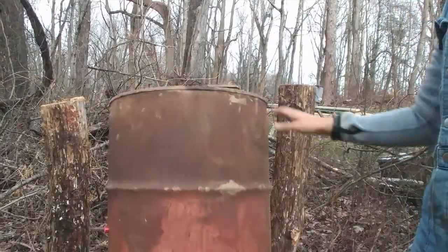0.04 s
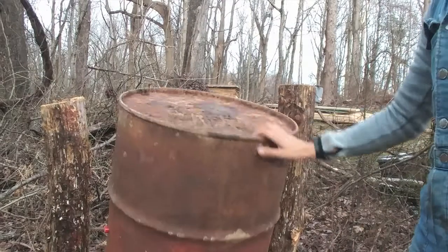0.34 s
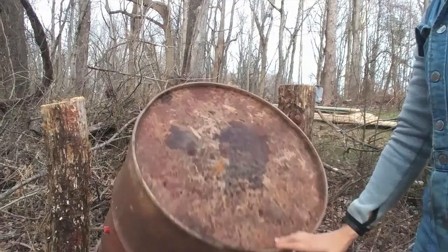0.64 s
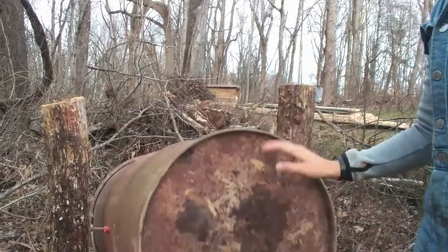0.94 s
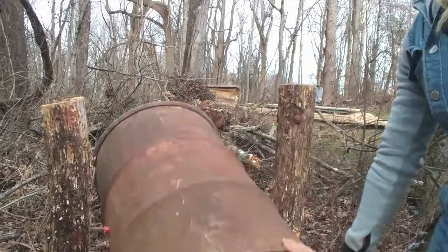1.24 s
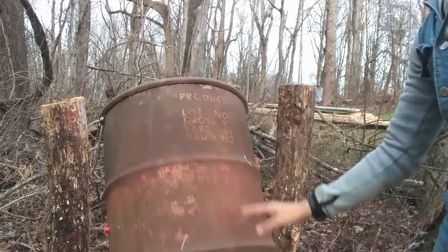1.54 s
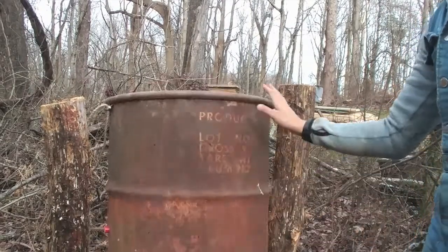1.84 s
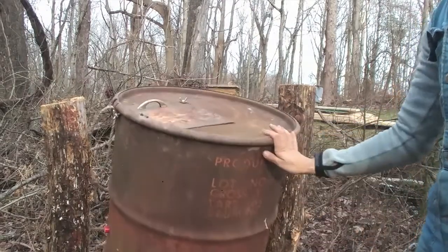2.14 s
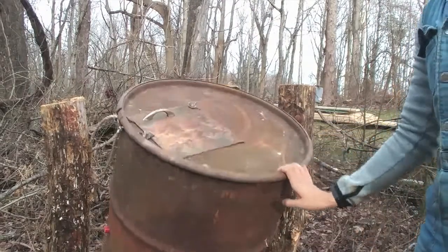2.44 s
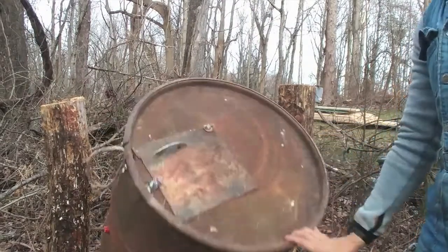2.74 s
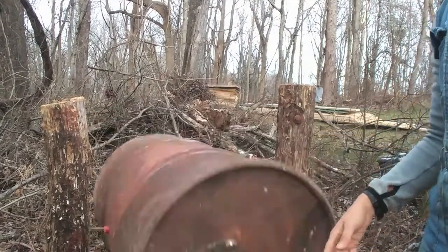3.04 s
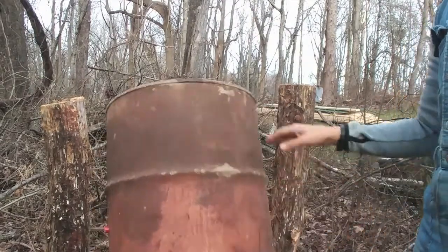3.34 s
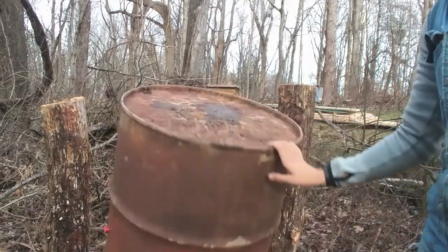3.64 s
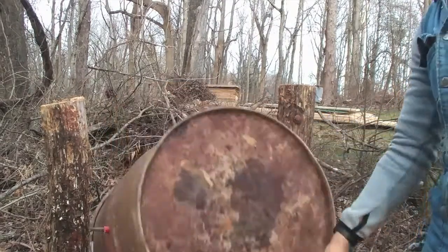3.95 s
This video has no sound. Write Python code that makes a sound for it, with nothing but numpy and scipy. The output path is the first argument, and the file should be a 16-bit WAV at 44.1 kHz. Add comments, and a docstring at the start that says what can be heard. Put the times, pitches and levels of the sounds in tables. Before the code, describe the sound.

Compost tumbles inside a turning steel drum, outdoors, close on the right. Rustling and sharp clacks lead into hollow, ringing thumps from about 0.3 to 0.5 seconds. After a lull near 1 second, dry litter slides again and clods boom down around 1.9 seconds. Softer scraping follows, then more thumps at 3.4 seconds, with clacks, rumbling lumps, brief hissing flakes and a faint high rust squeak near the end.

```python
"""Outdoors, close by and to the right, a rusty steel compost drum is turned end over end by hand.
At each half turn clods thump onto the end, which booms and rings, and hard bits clack on the steel.
Dry litter rustles along the wall, heavier compost scrapes after it and small lumps tumble: each is a
stream of tiny hits. Fine flakes hiss down, and the rust squeaks as it rubs.
Behind it lie a quiet low rumble and the microphone's thin hiss."""
import sys
import numpy as np
from scipy import signal
from scipy.fft import rfft, irfft
from scipy.io import wavfile

SR = 44100
rng = np.random.default_rng(int(sys.argv[2]) if len(sys.argv) > 2 else 0)


def int16_out(signal):
    """Quantize to a 16-bit WAV file."""
    q = np.round(np.clip(np.atleast_2d(signal).T, -1, 1) * 32767)
    wavfile.write(sys.argv[1], SR, q.astype(np.int16))


N = 176400
TIME = np.arange(N) / SR

# Levels are relative. A ring time is how long a sound takes to fade by 60 dB.
# Clods landing: (time [s], boom level [dB], boom pitch [Hz], boom ring time [s], drum ring level [dB],
# thud level [dB], treble cutoff [Hz])
CLOD_HITS = [(0.254, -14, 212, .16, -45, -48, 350), (0.267, -19.5, 70, 0.25, -33, -22, 412),
             (.287, -20, 215, 0.064, -46, -26, 506), (.375, -18.5, 141, 0.16, -18, -21, 1100),
             (0.382, -24.5, 73, 0.3, -40, -39, 900), (.406, -31.5, 165.6, 1.06, -35, -29, 864),
             (0.467, -26.5, 390, 0.42, -29, -32, 900), (1.841, -14, 132.7, 0.38, -47, -27, 425),
             (1.857, -23, 85.9, 0.65, -31, -55, 600), (1.954, -21.5, 90, 0.24, -29, -43, 292),
             (1.98, -14, 170, 0.18, -27, -21.5, 945), (1.992, -20.5, 333, 0.12, -35, -27, 800),
             (2.001, -22, 85.5, 0.48, -25.5, -24, 750), (2.012, -27.5, 214.7, 0.64, -35, -29, 800),
             (3.412, -22.5, 216, 0.47, -30, -21.5, 1100), (3.425, -20, 62, 0.091, -26.5, -29, 930),
             (3.44, -20, 64, 0.1, -34.5, -20, 600), (3.793, -39, 206.4, 0.96, -31.5, -47, 895)]
# Hard bits striking: (time [s], level [dB], ring time [s], gain below 1.2 kHz [dB], gain above 8 kHz [dB])
HARD_HITS = [(0.101, -29.5, 0.11, -19, -37), (0.181, -33.5, 0.55, 3, -24), (0.212, -22.5, 0.088, -1.5, 4.5),
             (.228, -28.5, 0.77, 10, -9), (0.376, -32, 0.1, 11, 4), (.742, -37, 0.25, -5, -57),
             (1.356, -36, 0.48, -10, -26), (1.579, -38.5, 0.38, 1, -6), (1.764, -33.5, 0.26, -16, -9),
             (1.455, -36.5, 0.085, -6, -11), (1.845, -28.5, 0.32, 14, -56), (2.991, -53, 0.21, -21, 7),
             (3.017, -47, 0.1, -4, 11), (3.282, -39.5, 0.37, -15, -4.5), (3.348, -35, 1, -4.5, -5),
             (3.424, -27.5, 0.15, 4, -2.5), (3.547, -26.5, 0.27, 10, -9), (3.597, -26.5, 0.16, -12, -12),
             (3.78, -32, 0.29, -20, -3.5), (3.961, -29.5, 0.39, -11, -6)]
# How loud the litter, compost and lumps are as they move: (time [s], level [dB])
LITTER_LEVELS = [(0, -38.5), (.28, -37), (.34, -47), (.40, -38.5), (.55, -43), (.66, -38.5), (.8, -52),
                 (.91, -65.5), (1.05, -59.5), (1.17, -62.5), (1.38, -45.5), (1.53, -50.5), (1.62, -40.5),
                 (1.80, -43.5), (2.02, -48), (2.15, -59.5), (2.42, -63), (2.52, -48.5), (2.67, -43),
                 (2.82, -51.5), (2.87, -63), (2.985, -62.5), (3.03, -49.5), (3.15, -46.5), (3.22, -54),
                 (3.45, -36.5), (3.72, -43), (3.88, -37), (3.95, -47.5), (4, -54)]
COMPOST_LEVELS = [(0, -42.5), (.11, -53), (.25, -41.5), (.49, -39.5), (.58, -47), (.68, -50), (.9, -75.5),
                  (1.19, -73), (1.33, -49.5), (1.52, -52), (1.6, -47), (2.0, -44), (2.2, -64.5),
                  (2.345, -63.5), (2.375, -48), (2.44, -60.5), (2.63, -48.5), (2.92, -80), (3.16, -50.5),
                  (3.22, -63.5), (3.45, -43.5), (3.85, -45), (4, -57.5)]
LUMP_LEVELS = [(0, -34), (.14, -45.5), (.32, -27.5), (.44, -32.5), (.49, -25.5), (.55, -35.5), (1.05, -71),
               (1.7, -64.5), (2.04, -32.5), (2.4, -68.5), (2.92, -77), (3.14, -53), (3.165, -46),
               (3.28, -62.5), (3.47, -29), (3.55, -38), (3.77, -51), (3.81, -30.5), (3.89, -31.5), (4, -45)]
# Showers of flakes: (time [s], fade time [s], level [dB], gain at 10.6 kHz [dB])
FLAKE_SHOWERS = [(.351, 0.059, -39.5, -14), (0.782, 0.38, -57, -31), (2.235, 0.057, -59.5, -22),
                 (3.599, 0.0086, -37.5, -11), (3.769, 0.023, -41, -9)]
# Rust rubbing: (time [s], length [s], level [dB])
RUST_SQUEAKS = [(0.597, 0.12, -48), (3.848, 0.1, -44.5)]
# The drum's low ringing tones and the rim's bright ones: (pitch [Hz], level [dB], ring time [s])
DRUM_TONES = [(60, -31, 0.48), (85.6, -15, 1), (135.1, -4, 0.46), (162.2, -5.5, 0.48), (209.8, -5, 0.49),
              (285.8, -0.5, 0.18), (323.6, -4, 0.18), (384, -2, 0.14), (448.5, -13.5, 0.53),
              (495.3, -2.5, 0.16), (605, -11.5, 0.29), (750, -14.5, 0.24), (801, -7.5, 0.32),
              (898, -14, .36), (1158, -11, 0.49)]
RIM_TONES = [(875, -23, 0.8), (2880, -4.5, .2), (2870, -10.5, .18)]
# How long the wall's many crowded tones last: (frequency [Hz], ring time [s])
WALL_RING_TIMES = [(100, 0.013), (400, 0.11), (1000, 0.049), (3000, 0.065), (8000, 0.16)]
# Each sound's colour, its balance of bass and treble at the microphone: (frequency [Hz], level [dB])
THUD_COLOUR = [(25, -30.5), (55, 5.5), (200, 2.5), (450, -3), (900, -2.5), (2000, -24), (6000, -18)]
CLACK_COLOUR = [(200, -37), (550, -27), (900, -15), (2300, -6), (2880, -1.5), (3500, -7), (5800, -11.5),
                (7000, -18.5), (8200, -9), (9400, -7.5), (10600, -30.5), (15000, -36.5)]
LITTER_COLOUR = [(300, -13), (900, -23.5), (1800, -17), (2350, -0.5), (3000, 4), (3600, -5.5), (4800, -13),
                 (5900, -13.5), (7000, -23.5), (8200, -8), (9300, -6), (10500, -27.5), (13400, -21.5),
                 (15500, -77)]
COMPOST_COLOUR = [(120, 4), (300, -22.5), (600, 0), (1250, 7.5), (1800, 8), (2800, -1.5), (4500, -30)]
LUMP_COLOUR = [(55, 9), (500, -1.5), (800, -3), (1500, -22.5), (5000, -40)]
BACKGROUND_COLOUR = [(30, -5), (85, 17.5), (200, -13.5), (500, -6.5), (1500, -33), (7000, -31.5),
                     (9000, -1), (10600, -33.5), (15500, -26)]
# How much weaker the left side is: (frequency [Hz], gain [dB])
LEFT_SHADE = [(900, -12.5), (2000, -16.5), (3200, -19.5), (5500, -10), (7000, -11.5), (9000, -19.5),
              (12000, -10)]
# How alike noise is in the two ears: (frequency [Hz], likeness [0 to 1])
EAR_LIKENESS = [(150, 0.8), (400, 0.32), (950, 0.85), (3000, 0.046)]

LITTER_PER_S, COMPOST_PER_S, LUMPS_PER_S, GRIT_PER_S = 2600, 900, 180, 70   # tiny hits a second
CRACK_SHARE, CRACK_S = 0.14, 0.0024   # the first snap of a hard hit
LUMP_RING_DB, LUMP_THUD_DB, LUMP_CUTOFF_HZ = -6.5, -6.5, 800
SPURTS_PER_S, SPURT_DB = 24, 1.85
FLAKE_FLICKERS_PER_S, FLICKER_DB = 180, 2.5
SQUEAK_HZ, SQUEAK_SPREAD, CHIRP_S = 9180, 0.147, 0.0015   # middle pitch, share either way, swell time
GRIT_DB, BACKGROUND_DB, MIC_DB = -12, -64.5, 4.5
LEFT_LAG_S, LOW_CUT_HZ, HIGH_CUT_HZ = .00013, 39.4, 15700


def clod_thumps():
    """A clod makes the loaded end boom, sets the drum ringing and lands with a crumbling thud."""
    out, t = np.zeros((2, N)), TIME[:SR]
    thud_colour = unit_energy(colour(THUD_COLOUR))
    for start, boom_db, boom_hz, ring_s, ring_db, thud_db, cutoff_hz in CLOD_HITS:
        onset = 1 - np.exp(-t / 0.00076)
        boom = -from_db(boom_db - 60 * t / ring_s) * np.sin(2 * np.pi * boom_hz * t) * onset
        ring = from_db(ring_db) * ringing_tones(DRUM_TONES, spread_db=9) / 2
        ring = np.pad(ring, (0, SR))[:SR]
        thud = from_db(thud_db) * through(stereo_noise(len(t)) * np.exp(-t / 0.015), thud_colour)
        add(out, start, boom + soften(ring + thud, cutoff_hz))
    return out


def hard_clacks():
    """A hard bit strikes the wall: a bright crack, then a brief ring of the wall and its rim."""
    out, t = np.zeros((2, N)), TIME[:SR // 2]
    clack_colour = unit_energy(colour(CLACK_COLOUR))   # their bright tone as the microphone colours it
    for start, db, ring_s, body_db, top_db in HARD_HITS:
        fade = from_db(-60 * t / ring_s) + CRACK_SHARE * np.exp(-t / CRACK_S)
        burst = through(stereo_noise(len(t)) * fade, clack_colour)
        rim = ringing_tones(RIM_TONES, spread_db=3)[:len(t)]
        balance = colour([(1200, body_db), (2600, 0), (3300, 0), (8000, top_db)])
        add(out, start, from_db(db) * through(burst + rim, balance))
    return out


def sliding_load():
    """Litter and compost slide over the rust in streams of tiny hits; bits of grit tick among them."""
    litter = wall_hits(LITTER_LEVELS, LITTER_COLOUR, LITTER_PER_S,
                       spread_db=4, crack_db=0, crack_s=0.0082)
    compost = wall_hits(COMPOST_LEVELS, COMPOST_COLOUR, COMPOST_PER_S,
                        spread_db=3.5, crack_db=-2, crack_s=0.0055, spots=2)
    grit = wall_hits(LITTER_LEVELS, CLACK_COLOUR, GRIT_PER_S, spread_db=1, crack_db=-2.5, crack_s=CRACK_S)
    return in_spurts(litter + compost) + from_db(GRIT_DB) * grit


def tumbling_lumps():
    """Soft lumps patter on the wall with a hollow knock and keep the drum's low tones rumbling."""
    lumps = random_clicks(LUMP_LEVELS, LUMPS_PER_S, spread_db=2.5)
    ring = unit_energy(soften(ringing_tones(DRUM_TONES, spread_db=4.5), LUMP_CUTOFF_HZ))
    thud = wall_hits(LUMP_LEVELS, LUMP_COLOUR, LUMPS_PER_S,
                     spread_db=2, crack_db=1, crack_s=0.0068, spots=2)
    return from_db(LUMP_RING_DB) * through(lumps, ring) + from_db(LUMP_THUD_DB) * thud


def flake_showers():
    """Dry flakes shower over the steel: a crisp, flickering hiss that starts at once and runs out."""
    out, t = np.zeros((2, N)), TIME[:SR]
    for start, fade_s, db, top_db in FLAKE_SHOWERS:
        hiss = stereo_noise(SR) * from_db(db + FLICKER_DB * wander(FLAKE_FLICKERS_PER_S)[:SR])
        fade = np.exp(-(t / fade_s) ** 2)
        crisp = colour([(6500, -18), (8400, -2.5), (9400, -1.5), (10600, top_db), (16000, -18)])
        add(out, start, through(hiss * fade, unit_energy(crisp)))
    return out


def rust_squeaks(chirps=40):
    """Rust sticks and slips as it rubs: a quick run of tiny high chirps, each at its own pitch."""
    out, t = np.zeros((2, N)), TIME[:SR // 10]
    swell = unit_energy(t * np.exp(-t / CHIRP_S))
    for start, length, db in RUST_SQUEAKS:
        gain = from_db(db) * np.sqrt(2 * SR * length / chirps)
        for when, pitch, *ear_phases in rng.random((chirps, 4)):
            hz = SQUEAK_HZ * (1 + SQUEAK_SPREAD * (2 * pitch - 1))
            tone = np.sin(2 * np.pi * (hz * t + np.array(ear_phases)[:, None]))
            add(out, start + when * length, gain * swell * tone)
    return out


def rumble_and_hiss():
    """Quiet, steady background: a low rumble and the microphone's thin high hiss."""
    return from_db(BACKGROUND_DB) * through(stereo_noise(N), unit_energy(colour(BACKGROUND_COLOUR)))


def ringing_tones(tones, spread_db):
    """Struck steel rings with fading tones, each given a random strength and sign."""
    t = TIME[:SR * 3 // 5]
    chance = rng.uniform(-1, 1, (len(tones), 2))
    return sum(np.sign(side) * from_db(db + spread_db * luck - 60 * t / ring_s)
               * np.sin(2 * np.pi * hz * t) for (hz, db, ring_s), (luck, side) in zip(tones, chance))


def wall_hits(levels, spectrum, per_s, spread_db, crack_db, crack_s, spots=3):
    """A stream of hits shared among a few spots on the wall, each with its own ring."""
    streams = (through(random_clicks(levels, per_s / spots, spread_db),
                       wall_ring(spectrum, crack_db, crack_s)) for _ in range(spots))
    return sum(streams) / np.sqrt(spots)


def random_clicks(levels, per_s, spread_db):
    """Clicks of uneven size at random moments, whose loudness follows a table."""
    sizes = from_db(spread_db * np.minimum(rng.exponential(1, N), 4)) * rng.choice([-1, 1], N)
    clicks = sizes * (rng.random(N) < per_s / SR)
    return clicks / clicks.std() * from_db(np.interp(TIME, *np.transpose(levels)))


def wall_ring(spectrum, crack_db, crack_s):
    """The wall after one hit: a short crack, and a ring whose frequency bands fade at their own speeds."""
    t = TIME[:SR // 2]
    ring = sum(band * unit_energy(from_db(-60 * t / at_hz(WALL_RING_TIMES, hz)))
               for hz, band in split_bands(stereo_noise(len(t)), first_edge_hz=150, count=9))
    crack = stereo_noise(len(t)) * unit_energy(np.exp(-t / crack_s))
    return unit_energy(through(ring + from_db(crack_db) * crack, colour(spectrum)))


def in_spurts(sound):
    """Loose litter catches and lets go: the whole sound surges, and each band also flickers by itself."""
    surge_db = SPURT_DB * wander(SPURTS_PER_S)
    return sum(band * from_db(surge_db + FLICKER_DB * wander(2 * SPURTS_PER_S))
               for _, band in split_bands(sound, first_edge_hz=1000, count=10))


def split_bands(sound, first_edge_hz, count):
    """Cut a sound into bands from bass to treble; give each one's middle frequency and sound."""
    size = sound.shape[-1]
    spectrum, hz = rfft(sound), np.arange(size // 2 + 1) * SR / size
    edges = np.r_[0, np.geomspace(first_edge_hz, SR / 2, count)]
    for low, high in zip(edges, edges[1:]):
        yield (low + high) / 2, irfft(spectrum * ((hz >= low) & (hz < high)), size)


def wander(per_s):
    """A value that glides up and down at random, by about 1."""
    steps = rng.standard_normal(SR // 10)
    return np.interp(TIME * per_s, np.arange(len(steps)), steps)


def stereo_noise(size):
    """White noise, partly alike in both ears but not in the treble."""
    shared, separate = rfft(rng.standard_normal((2, size)))
    alike = np.clip(at_hz(EAR_LIKENESS, np.arange(len(shared)) * SR / size), 0, 1)
    left = alike * shared + np.sqrt(1 - alike ** 2) * separate
    return irfft(np.array([left, shared]), size)


def colour(points, size=4096):
    """A filter's response with the given balance of bass and treble."""
    hz = np.arange(size // 2 + 1) * SR / size
    cepstrum = irfft(np.log(from_db(at_hz(points, hz))))
    # Fold the second half onto the first, so nothing sounds before the hit.
    cepstrum[1:size // 2] *= 2
    cepstrum[size // 2 + 1:] = 0
    return irfft(np.exp(rfft(cepstrum)))


def soften(sound, cutoff_hz):
    """A soft hit loses its treble."""
    return signal.sosfilt(signal.butter(2, cutoff_hz, fs=SR, output="sos"), sound + 1e-18)


def through(sound, response):
    """Play a sound through a response (what a filter or object gives back for one click)."""
    return signal.fftconvolve(np.atleast_2d(sound), np.atleast_2d(response), axes=-1)[:, :sound.shape[-1]]


def at_hz(points, hz):
    """Read between a table's rows, with the frequencies spaced by octaves."""
    row_hz, values = np.transpose(points)
    return np.interp(np.log(hz + 1), np.log(row_hz), values)


def unit_energy(x):
    """Scale a response so its channels have an average energy of 1."""
    return x / np.sqrt(np.mean(np.sum(x ** 2, axis=-1)))


def from_db(db):
    """Turn decibels into a gain."""
    return 10 ** (np.asarray(db) / 20)


def add(out, start_s, sound):
    """Mix a sound in at a given time."""
    i = int(start_s * SR)
    out[..., i:i + sound.shape[-1]] += sound[..., :max(N - i, 0)]


def scene():
    """The drum over a quiet background; the left side is much weaker and hears it a little later."""
    background = rumble_and_hiss()
    drum = (clod_thumps() + hard_clacks() + sliding_load()
            + flake_showers() + rust_squeaks() + tumbling_lumps())
    left, right = drum + background
    left = through(left, colour(LEFT_SHADE))[0]
    left = np.pad(left, (round(LEFT_LAG_S * SR), 0))[:N]
    return np.array([left, right])


def record(dry):
    """The microphone turns the sound up and cuts the deepest bass and highest treble."""
    bass_cut = signal.butter(4, LOW_CUT_HZ, "high", fs=SR, output="sos")
    treble_cut = signal.ellip(10, .1, 80, HIGH_CUT_HZ, fs=SR, output="sos")
    return signal.sosfilt(treble_cut, signal.sosfilt(bass_cut, from_db(MIC_DB) * dry))


dry = scene()
out = record(dry)
int16_out(out)
```